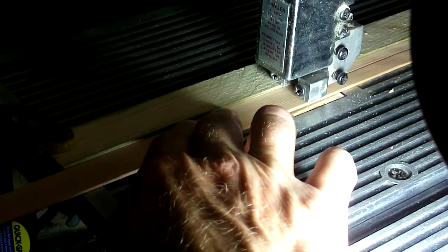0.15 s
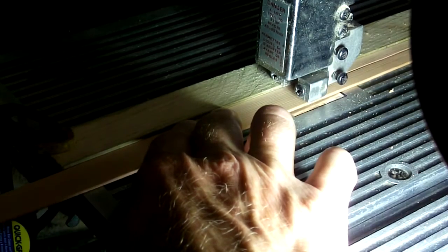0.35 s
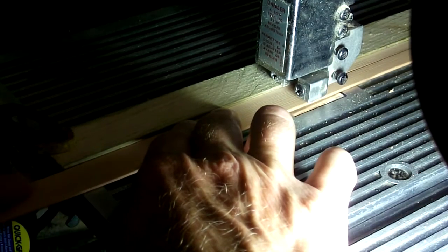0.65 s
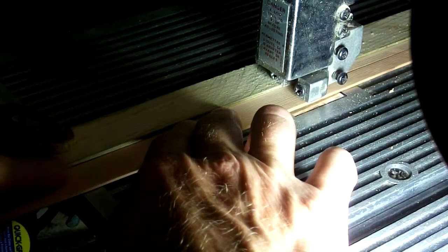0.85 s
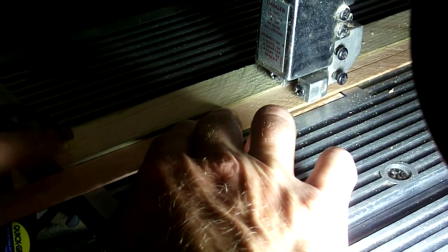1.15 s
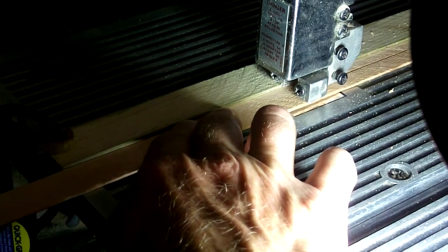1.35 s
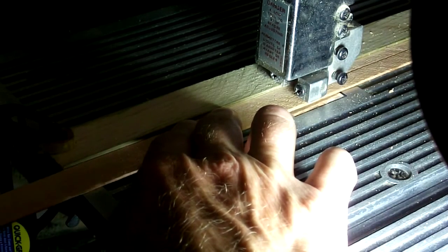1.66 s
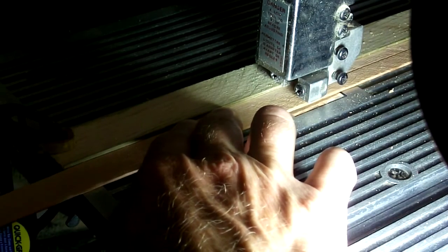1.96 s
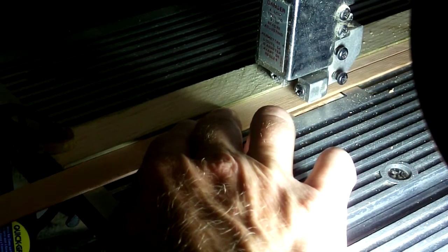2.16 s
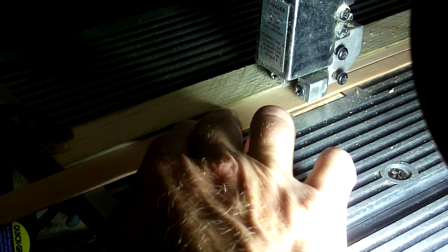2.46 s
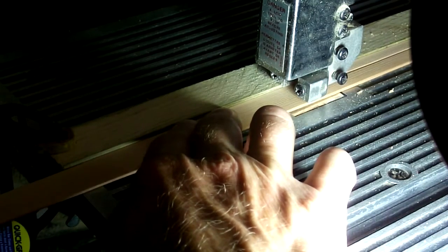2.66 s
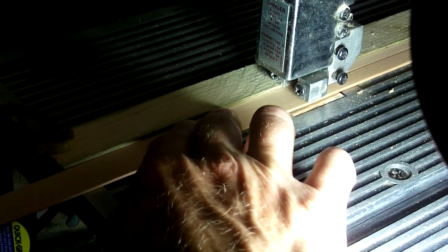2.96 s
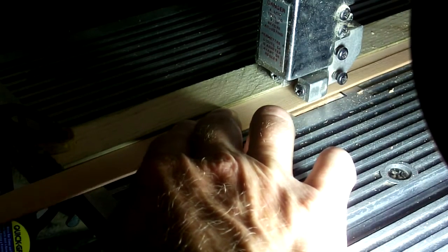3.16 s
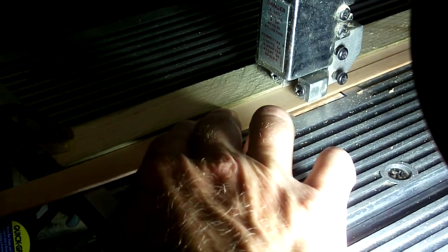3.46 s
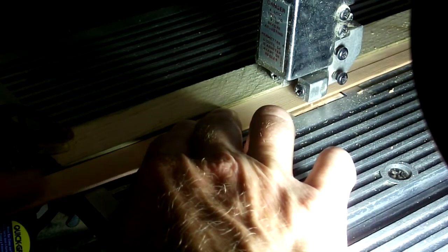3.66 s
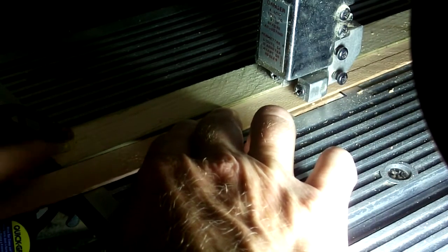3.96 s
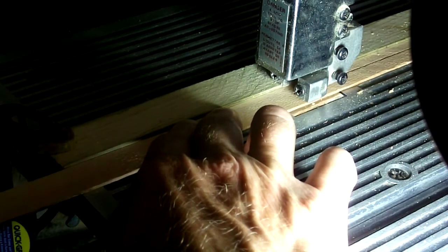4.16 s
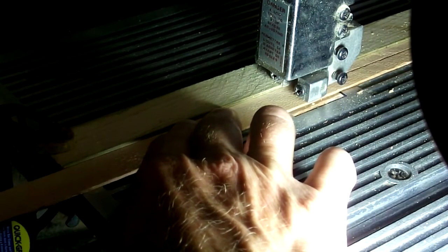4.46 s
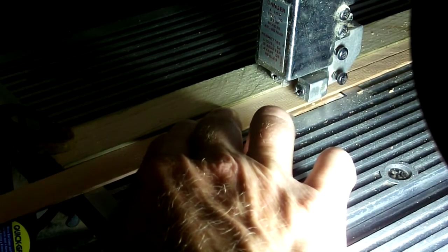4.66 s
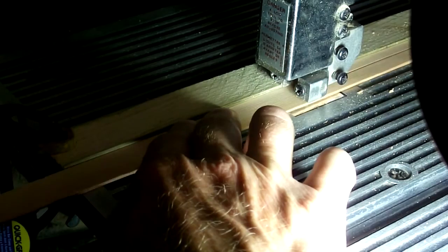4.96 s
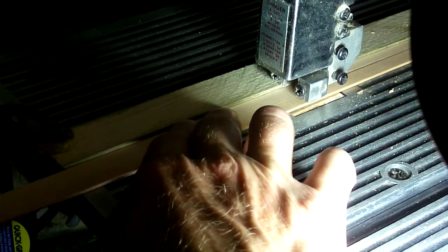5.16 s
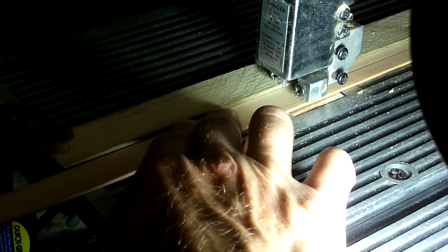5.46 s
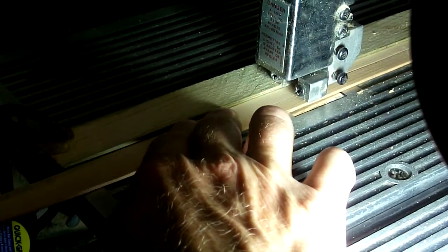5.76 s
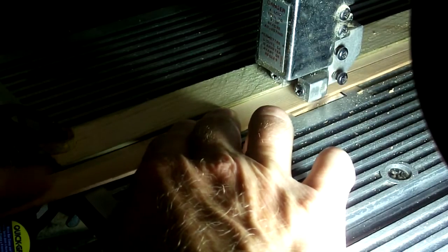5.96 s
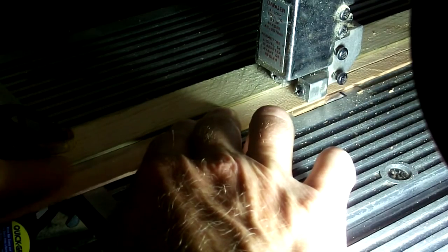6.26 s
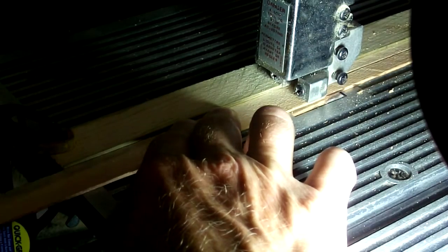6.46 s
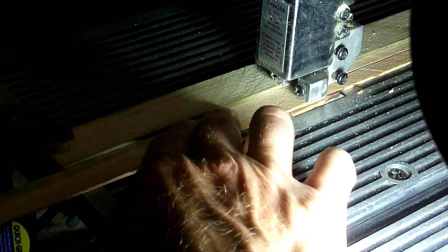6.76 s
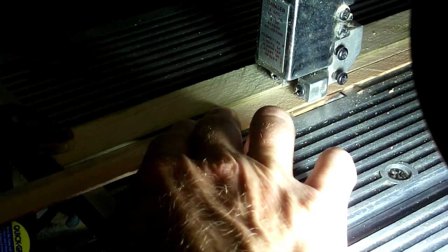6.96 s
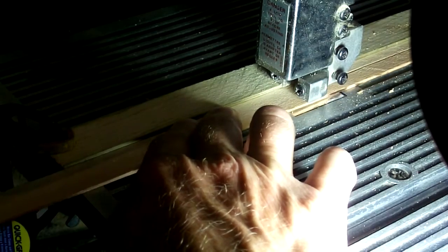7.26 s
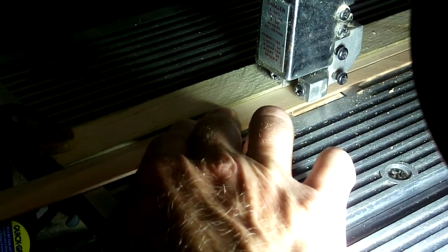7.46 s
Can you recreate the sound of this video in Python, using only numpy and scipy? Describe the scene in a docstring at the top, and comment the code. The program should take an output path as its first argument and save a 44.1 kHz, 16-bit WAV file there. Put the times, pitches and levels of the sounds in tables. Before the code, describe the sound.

A bandsaw is heard very close and dry in narrow stereo, already cutting from 0 s. Its steady, slightly rough whine sits near 2.1 kHz, with upper tones around 4.1 and 5.5 kHz, over bright hissing of torn wood fibre. The whine flickers, with brief drop-outs, and the cut weakens until about 1.1 s. Low-mid motor rumble swells, and from about 1.3 s the free blade rattles metallically, throbbing around eighteen times a second, with small ringing snags. At 2.04 s a soft low thud and the full whine return, lasting until 3.9 s. Rumble and brighter chatter fill the next pause, with sharp ticks near 4.05 s and strong cracks at 4.8 s as cutting resumes. This cut runs to 6.3 s. A last pause builds to rattle from 6.6 s, then the wood is bitten again at 7.39 s, still whining at the abrupt end, 7.6 s.

```python
"""A benchtop bandsaw cuts a thin board in four pushes, close to a small two-port microphone.
While the board is fed, the teeth whine on multiples of their strike rate (sines) over the hiss of torn
fibre (coloured noise). Between pushes the free blade rattles in its guides (noise through resonances)
and the rumble of motor and frame (low noise and tones) swells. Snags ring the blade (fading sines and a
short noise crack) and the table thuds (low fading sines)."""
import sys
import numpy as np
from scipy import signal
from scipy.fft import rfft, irfft
from scipy.io import wavfile
from scipy.ndimage import uniform_filter1d

SR = 44100
rng = np.random.default_rng(int(sys.argv[2]) if len(sys.argv) > 2 else 0)


def invert_db(x):
    """Field ratio 10**(x/20) for x, a level in decibels (scalar or array-like)."""
    u = np.asarray(x, float) / 20
    return 10 ** u


def unload_wav(signal):
    """Save mono or channel-first audio to the path in sys.argv[1] as 16-bit WAV at rate SR, clipped to [-1, 1]."""
    wavfile.write(
        sys.argv[1],
        SR,
        np.round(np.clip(np.atleast_2d(signal).T, -1, 1) * 32767).astype(np.int16),
    )


N = 336042  # length in samples
T = np.arange(N) / SR  # time of each sample, s
HZ = np.maximum(np.fft.rfftfreq(N, 1 / SR), 1)  # frequency of each spectrum bin
WHEEL_HZ = 18.3  # wheel turns per second


def unit(x):
    """Scaled to rms 1."""
    return x / np.sqrt(np.mean(x ** 2))


def walk(rate):
    """Slow random wander: levels held for 1 / rate seconds, smoothed twice, scaled to rms 1."""
    hold = int(SR / rate)
    steps = np.repeat(rng.standard_normal(N // hold + 1), hold)
    return unit(uniform_filter1d(uniform_filter1d(steps, hold), hold)[:N])


def sine(hz, phase=0):
    """Steady tone over the whole scene, with a phase in radians."""
    return np.sin(2 * np.pi * hz * T + phase)


def curve(points):
    """Straight lines through (time, level) points."""
    return np.interp(T, *np.transpose(points))


def shape(points, peaks=()):
    """Gain over frequency: (Hz, dB) points, with (Hz, width Hz, dB) resonances on top."""
    hz, db = np.transpose(points)
    gain = invert_db(np.interp(np.log(HZ), np.log(hz), db))
    for hz, width, db in peaks:
        bell = 1 / (1 + (2 * (HZ - hz) / width) ** 2)
        gain = gain * np.sqrt(1 + (invert_db(2 * db) - 1) * bell)
    return gain


def hiss(drive, gain, flicker_db, rate):
    """Coloured noise whose two-thirds-octave bands each flicker on their own."""
    spectrum = rfft(drive) * gain
    place = 1.5 * np.log2(np.maximum(HZ / 60, 1))  # band number along the spectrum
    total = np.zeros(N)
    for k in range(14):
        band = np.cos(np.pi / 2 * np.clip(place - k, -1, 1)) ** 2
        total += irfft(spectrum * band, N) * invert_db(flicker_db * walk(rate))
    return unit(total)


def grit(spread_db):
    """Noise of uneven grains."""
    return rng.standard_normal(N) * invert_db(spread_db * walk(900))


def spans(tables, fade=0.014):
    """Columns of several tables on one time line, and a gate that is open while one lasts (fade in s)."""
    times, *columns = np.transpose(np.concatenate(tables))
    gate = np.zeros(N)
    for k, table in enumerate(tables):
        start, end = table[0][0], table[-1][0]
        if k == 0 and start < fade:
            start -= 1  # already open when the sound begins
        gate += (T > start) * (T <= end)
    return uniform_filter1d(gate, int(fade * SR)), [np.interp(T, times, c) for c in columns]


def dips(events, half_s):
    """Bell-shaped level changes in dB at (time, depth) events; a negative depth is a surge."""
    return -sum(db * np.exp(-((T - s) / half_s) ** 2) for s, db in events)


def teeth():
    """Phase of the passing teeth: a push slows the blade, which creeps back; the shaft shakes the timing."""
    free_hz, bite_hz, creep_hz_per_s = 692.6, 690, 1.15  # teeth per second, and gain per second
    sag_s, recover_s, shaft_hz = 0.1, 0.7, 29.7
    rate = []
    for push in PUSHES:
        start, end = push[0][0], push[-1][0]
        rate += [(start, free_hz), (start + sag_s, bite_hz)]
        rate += [(end, bite_hz + creep_hz_per_s * (end - start)), (end + recover_s, free_hz)]
    turn = 2 * np.pi * np.cumsum(curve(rate[1:])) / SR  # the first push is already slowed
    shake = 0.17 * sine(shaft_hz, 1.98 * walk(3))
    return turn + shake + 0.093 * walk(40) + 0.16 * walk(9)


# chip hiss, one list per push, before a 4.5 dB lift: (time [s], level [dB])
PUSHES = [
    [(0.0, -21.5), (0.232, -23), (0.308, -20), (0.38, -21), (0.62, -22), (0.654, -26), (0.71, -21.5),
     (0.778, -27), (0.87, -23.5), (0.932, -28.5), (0.948, -22.5), (1.12, -35.5)],
    [(2.04, -20), (2.066, -20.5), (2.574, -22.5), (2.584, -23.5), (2.924, -23.5), (2.972, -21),
     (3.29, -27.5), (3.312, -26), (3.322, -25), (3.406, -22), (3.866, -23.5), (3.92, -29)],
    [(4.785, -18), (4.831, -26.5), (4.859, -19), (4.881, -29), (4.919, -23), (5.267, -23), (5.277, -26),
     (5.435, -21), (5.461, -25), (5.583, -23), (6.277, -24), (6.295, -28)],
    [(7.39, -26), (7.406, -21), (7.442, -29.5), (7.466, -20.5), (7.62, -26)],
]
# third multiple of the tooth rate between its drop-outs, one list per push: (time [s], level [dB])
THIRD = [
    [(0, -20.5), (.2, -20.5), (.4, -19), (.85, -26.5), (1.04, -26.5), (1.12, -36)],
    [(2.04, -25.5), (2.16, -23.5), (2.35, -27), (2.5, -19.5), (2.7, -28.5), (2.92, -20), (3.15, -25),
     (3.48, -19.5), (3.65, -25.5), (3.8, -17.5), (3.92, -29)],
    [(4.79, -26.5), (5.11, -19), (5.3, -21.5), (5.43, -20.5), (5.6, -22.5), (5.83, -20), (6.03, -21),
     (6.28, -24.5)],
    [(7.39, -21), (7.62, -24)],
]
# sixth multiple, one list per push: (time [s], level [dB])
SIXTH = [
    [(0.0, -25), (0.154, -18), (0.19, -31), (0.436, -20), (0.538, -37), (0.552, -26.5), (0.732, -21),
     (0.77, -26), (1.028, -31), (1.11, -43), (1.12, -52)],
    [(2.045, -19), (2.107, -23), (2.675, -22.5), (2.873, -27.5), (2.921, -18), (3.167, -21), (3.307, -27),
     (3.427, -18), (3.517, -27.5), (3.621, -20.5), (3.92, -26.5)],
    [(4.795, -21.5), (4.955, -25.5), (5.055, -18.5), (5.093, -24.5), (5.267, -17), (5.317, -28),
     (5.433, -21), (5.491, -30), (5.565, -24), (6.181, -22.5), (6.285, -30)],
    [(7.39, -23), (7.4, -15), (7.476, -31), (7.498, -18), (7.62, -24)],
]
# eighth multiple, one list per push: (time [s], level [dB])
EIGHTH = [
    [(0.0, -29), (0.358, -35), (0.386, -28), (0.442, -39), (0.998, -34), (1.084, -50), (1.12, -57)],
    [(2.045, -27), (3.167, -29), (3.333, -38), (3.395, -37), (3.725, -34), (3.835, -20), (3.92, -30)],
    [(4.795, -23), (4.897, -27.5), (5.719, -26), (5.915, -34), (5.931, -31), (6.271, -23), (6.285, -29)],
    [(7.39, -26), (7.524, -26), (7.62, -31)],
]
# drop-outs of the third multiple, perhaps an uneven stretch of blade passing: (time [s], depth [dB])
DROPOUTS = [(.065, 29), (.31, 28), (.64, 12), (.77, 1), (2.21, 4), (2.29, 4), (2.61, 15), (3.0, 16),
            (3.26, 6), (3.575, 18), (4.9, 6), (5.235, 15), (5.51, 16), (5.91, 15), (7.52, 3)]
# weaker multiples of the tooth rate: (multiple [1], level against the chip hiss [dB])
TEETH = [(4, -28), (5, -15.5), (7, -40), (9, -14), (10, -22), (12, -23.5), (15, -28), (18, -42)]
# colour of the chip hiss: (frequency [Hz], relative level [dB per Hz])
CHIPS = [(180, -52), (300, -51), (685, -21.5), (1120, -21), (1900, -9.5), (2900, -10.5), (4200, -8),
         (5700, -10.5), (8000, -20.5), (10400, -28), (13000, -32), (15600, -31)]
# board resonances: (frequency [Hz], width [Hz], level over the hiss [dB])
BOARD = [(948, 137, 6.5), (2618, 93, 6.5), (3560, 57, -8.5), (5520, 56, 5), (7600, 220, 4)]


def cutting(turn):
    """Teeth strike the wood in turn, whining on multiples of their rate, and tear out hissing chips."""
    gate, (chips_db,) = spans(PUSHES)
    drop_db = dips(DROPOUTS, half_s=0.026)
    # the hiss follows a small share of each drop-out
    chips_db = chips_db + 0.095 * drop_db + 0.68 * walk(30)
    wheel = sine(WHEEL_HZ, 1.2 + 1.1 * walk(2.82))
    bite = invert_db(0.28 * walk(25) + 0.99 * walk(90) + 0.22 * wheel)
    third_db = curve(np.concatenate(THIRD)) + drop_db + 0.43 * walk(30) + 2.15 * walk(110)
    sixth_db = curve(np.concatenate(SIXTH)) + 1.6 * walk(30) + 2.74 * walk(140)
    eighth_db = curve(np.concatenate(EIGHTH)) + 2.0 * walk(25) + 1.2 * walk(140)
    whine = invert_db(third_db) * np.sin(3 * turn)
    whine += invert_db(sixth_db) * np.sin(6 * turn)
    whine += invert_db(eighth_db) * np.sin(8 * turn)
    # bent and dull teeth make each weaker multiple come and go
    weak = np.zeros(N)
    for multiple, db in TEETH:
        weak += invert_db(db + 4.0 * walk(45)) * np.sin(multiple * turn + rng.uniform(0, 2 * np.pi))
    strikes = grit(0.94) * (1 + 0.47 * np.sin(turn))  # noise pulsing with each tooth
    fibre = hiss(strikes, shape(CHIPS, BOARD), flicker_db=0.46, rate=34)
    # root 2 gives each sine an rms of 1 before its level
    chips = invert_db(chips_db + 4.5) * (fibre + np.sqrt(2) * weak)
    return gate * bite * (np.sqrt(2) * whine + chips)


# rumble once the board lets go, before a 2.5 dB lift: (swell start [s], board bites again [s],
# level after the rise [dB], level before the bite [dB])
RUMBLE = [(0.913, 2.055, -30.5, -35), (3.837, 4.77, -32.5, -32), (6.337, 7.38, -29, -31.5)]
# colour of the frame rumble: (frequency [Hz], relative level [dB per Hz])
FRAME = [(47, -54), (80, -20), (109, -15.5), (235, -9.5), (269, -12), (319, -3.5), (438, -0.5), (568, -2),
         (673, 0), (1200, -4), (1560, -50), (2640, -120)]
# motor tones: (frequency [Hz], peak level against the rumble [dB])
MOTOR = [(119, -19.5), (162, -24.5), (238, -17.5), (328, -15), (447, -12), (495, -10), (680, -20),
         (1057, -7)]
# swells of the tooth-rate hum over its resting level: (time [s], rise [dB], half length [s])
HUM_SWELLS = [(.2, 4.5, 0.25), (0.604, 15, 0.026), (0.717, 15.5, 0.049), (.87, 14.5, 0.064),
              (1.36, 12, 0.11), (1.75, 7, 0.28), (2.08, 6, 0.089), (2.227, 15, 0.053), (2.76, 9.5, 0.16),
              (3.08, 7, 0.08), (3.297, 5, .06), (3.636, 8, .08), (4.77, 12, 0.028), (4.954, 8.5, .1),
              (5.22, 11, 0.057), (5.61, 8, 0.084), (5.938, 8.5, 0.048), (6.95, 14, 0.033),
              (7.094, 16, 0.046)]
# second multiple of the tooth rate: (time [s], peak level [dB])
SECOND = [(0.0, -40), (1.48, -34), (3.93, -38.5), (3.97, -50), (4.54, -31), (5.28, -43), (5.98, -36),
          (6.07, -51), (7.15, -33), (7.62, -45)]
# faint whine of teeth passing the guides between pushes: (multiple [1], peak level [dB])
IDLE_WHINE = [(3, -35.5), (6, -36)]


def machine(turn):
    """Frame rumble with wavering motor tones, and the hum of teeth passing the guides."""
    gate, (feed_db,) = spans(PUSHES, fade=0.14)
    damped_db, rise_s, fall_s = -46.5, 0.53, 0.14  # rumble under the board before the 2.5 dB lift
    # 0.95 of the swing in feed level shakes the frame too
    rumble_db = damped_db + 0.95 * gate * np.maximum(feed_db + 23.5, -4) + 1.34 * walk(20)
    for start, bite, db, last_db in RUMBLE:
        rumble_db += curve([(start, 0), (start + rise_s, db - damped_db),
                            (bite, last_db - damped_db), (bite + fall_s, 0)])
    rumble_db += 2.5 + 0.47 * sine(WHEEL_HZ, 0.66)
    frame = hiss(grit(2.95), shape(FRAME), flicker_db=0.5, rate=4.1)
    tones = sum(invert_db(db + 2.47 * walk(9.7)) * sine(hz, 1.73 * walk(14)) for hz, db in MOTOR)
    hum_db = -43.5 + 3.3 * walk(30)  # resting level and its wander
    for s, db, half_s in HUM_SWELLS:
        hum_db += db * np.exp(-((T - s) / half_s) ** 2)
    hum = invert_db(hum_db) * np.sin(turn + 0.43 * walk(15))
    hum += invert_db(curve(SECOND) + 2.5 * walk(25)) * np.sin(2 * turn)
    idle = sum(invert_db(db + 2.8 * walk(35)) * np.sin(k * turn) for k, db in IDLE_WHINE)
    return invert_db(rumble_db) * (frame + tones) + hum + (1 - gate) * idle


def low_flutter():
    """A faint flutter of very low noise, stronger while the board is pushed."""
    pushed = 0.3 + 0.52 * spans(PUSHES, fade=0.15)[0]
    colour = shape([(8, -6), (30, 0), (90, -5), (300, -8), (600, -30)])  # (Hz, dB)
    return invert_db(-54) * pushed * hiss(rng.standard_normal(N), colour, flicker_db=2.4, rate=7)


# pauses between pushes: (start [s], end [s], middle of the swell [s], swell length [s],
# rattle level before [dB] and after [dB], treble over it before [dB] and after [dB], less 3 dB)
PAUSES = [(0.994, 2.067, 1.267, 0.21, -30, -21.5, -3.5, -1.1), (3.885, 4.8, 4.33, 0.066, -28, -21, 2, 0.22),
          (6.243, 7.408, 6.633, 0.34, -32.5, -21, 1, -1.8)]
# brief falters (positive) and surges (negative) of the rattle: (time [s], depth [dB])
LULLS = [(1.345, -2.5), (1.42, 3.5), (1.49, 2.5), (1.646, 0), (1.68, -2.5), (1.745, 3.5), (1.965, 7.5),
         (4.1, 9), (4.31, -7.5), (4.4, 4.5), (4.45, -1.5), (4.5, 5), (4.56, -2.5), (4.6, 2.5), (6.62, 2),
         (6.83, -2), (6.9, -2), (7.028, 4), (7.13, 1), (7.175, -1.5), (7.246, 3.5), (7.352, 7)]
# throb of the free blade, one row per pause: (time of one crest [s], depth [dB])
THROBS = [(1.608, 0), (4.306, -0.1), (6.943, 1.36)]
# colour of the rattle: (frequency [Hz], relative level [dB per Hz])
RATTLE = [(410, -58), (700, -10.5), (1300, -11), (2200, -7.5), (3300, -7.5), (4600, -5), (6600, -5.5),
          (8200, -15.5), (11000, -24.5), (15600, -28)]
# blade and guide resonances, before all are turned down 3 dB: (frequency [Hz], width [Hz],
# level against the rattle in the first [dB], second [dB] and third pause [dB])
GUIDES = [(1369, 26, -10, -21, -17.5), (1690, 25, -7.5, -5.5, -9), (2133, 50, -9.5, -9.5, -6),
          (2206, 33, -11.5, -11, -5), (3265, 68, -8, -7.5, -6.5), (4146, 130, -16, -10.5, -13),
          (4330, 55, -8, -28, -9), (5230, 78, -5, -30, -22), (5090, 140, -14, -23, -26),
          (5770, 76, -15, -12, -14), (6170, 45, -26, -27, -14), (6560, 260, -11.5, -32, -26),
          (7660, 280, -14, -18, -15), (8170, 150, -43, -26, -40)]


def rattle():
    """The free blade chatters in its guides, throbbing per wheel turn; how it sits sets which parts ring."""
    levels = []
    for start, end, middle, swell, before, after, treble_before, treble_after in PAUSES:
        levels.append([(start, before, treble_before), (middle - swell / 2, before, treble_before),
                       (middle + swell / 2, after, treble_after), (end, after, treble_after)])
    gate, (db, treble_db) = spans(levels, fade=0.07)
    db = db + dips(LULLS, half_s=0.014) + 1.0 * walk(30)
    pause = np.searchsorted([row[1] for row in PAUSES[:-1]], T)  # which pause each sample belongs to
    crest, depth_db = np.take(THROBS, pause, axis=0).T
    wheel = np.cos(2 * np.pi * WHEEL_HZ * (T - crest) + 0.2 * walk(2.83))
    throb = invert_db(depth_db * wheel + 0.19 * walk(25) + 1.23 * walk(110))
    drive = grit(0.49)
    chatter = rfft(hiss(drive, shape(RATTLE), flicker_db=0.3, rate=25))
    # split into body and treble between 3700 and 4300 Hz
    high = np.clip((HZ - 3700) / 600, 0, 1)
    body = unit(irfft(chatter * (1 - high), N))
    treble = unit(irfft(chatter * high, N)) * invert_db(treble_db - 3.0 + 0.53 * wheel + 0.79 * walk(22))
    shaken = rfft(drive) * shape(RATTLE)
    rings = np.zeros(N)
    for hz, width, *pause_db in GUIDES:
        ring = unit(irfft(shaken / (1 + 2j * (HZ - hz) / width), N))
        rings += invert_db(np.take(pause_db, pause) + 2.6 * walk(60)) * ring
    return gate * invert_db(db) * throb * (body + treble + invert_db(-3) * rings)


# the blade snags, before 13.5 dB is taken off: (time [s], level [dB])
SNAGS = [(1.3564, -4.5), (1.3894, 3), (1.6072, 9), (1.7045, -8), (1.82, -5), (1.8698, 4), (1.928, -11),
         (2.1454, -6), (4.0402, 2), (4.0766, 5), (4.1457, -6), (4.368, -2), (4.459, 5), (4.7748, 12.5),
         (4.8017, 9.5), (4.8654, 5), (6.6612, -9), (6.7645, 3), (6.8239, -3), (7.002, -2), (7.1471, -10),
         (7.0399, -2), (7.3701, -12), (7.3936, 1), (7.4674, 4)]
# ringing of the snagged blade: (frequency [Hz], level [dB], time to fade by 60 dB [s])
SNAG_RING = [(2146, -6.5, 0.026), (3210, -7, 0.02), (5640, -3.5, 0.016)]
# the table jolts as the board meets the blade, before an 8 dB lift: (time [s], level [dB])
THUDS = [(2.04, -41), (4.78, -50), (7.39, -37)]


def knocks():
    """Snags ring the blade briefly with a short crack; jolts thud through the table."""
    out, t = np.zeros(N + SR), T[:SR // 4]
    contact = np.diff(np.hanning(9))  # one short push and release, which dulls the crack
    for s, db in SNAGS:
        ring = np.zeros(len(t))
        for hz, ring_db, t60 in SNAG_RING:
            fade = np.exp(-np.log(1000) * t / t60)
            ring += invert_db(ring_db) * fade * np.sin(2 * np.pi * hz * t + rng.uniform(0, 2 * np.pi))
        crack = np.convolve(rng.standard_normal(len(t)), contact, "same") * np.exp(-t / 0.0019)
        out[int(s * SR):][:len(t)] += invert_db(db - 13.5) * (ring + invert_db(-5.0) * crack)
    thud = t / 0.013 * np.exp(-t / 0.011) * np.sin(2 * np.pi * 38 * t)
    for s, db in THUDS:
        out[int(s * SR):][:len(t)] += invert_db(db + 8.0) * thud
    return out[:N]


# phase lead of the left port, negative where it lags: (frequency [Hz], lead [rad])
PORTS = [(0, 0), (1500, 0), (2100, -.25), (8200, -1.1), (11600, -1.6), (13000, -1.9)]
# smeared echoes, added to the left port and subtracted from the right: (frequency [Hz], level [dB])
ECHO_LEVEL = [(30, -14), (60, -33), (130, -35), (300, -30), (1000, -31), (3000, -21.5), (8000, -12),
              (15000, -22)]


def scene():
    """All sources reach two close ports, the left a little later; the treble differs between them."""
    turn = teeth()
    mid = cutting(turn) + machine(turn) + low_flutter() + rattle() + knocks()
    lead = np.exp(0.5j * np.interp(HZ, *np.transpose(PORTS)))  # half the lead for each port
    # reflections: the same sound smeared by a short random echo pattern
    echoes = rng.standard_normal(2048) * np.exp(-np.arange(2048) / 400)
    echoes = echoes / np.sqrt(np.sum(echoes ** 2))
    side = rfft(signal.fftconvolve(mid, echoes)[:N]) * shape(ECHO_LEVEL)
    both = rfft(mid)
    left = irfft(both * lead + side, N)
    right = irfft(both / lead - side, N)
    return np.array([left, right])


def low_pass(x):
    """Removes everything above the highest recorded frequency."""
    return signal.sosfilt(signal.butter(12, 15730, fs=SR, output="sos"), x)


def record(dry):
    """Any peaks beyond full scale are clipped."""
    mix = np.clip(dry, -1, 1)
    return low_pass(mix)


dry = scene()
out = record(dry)
unload_wav(out)
```